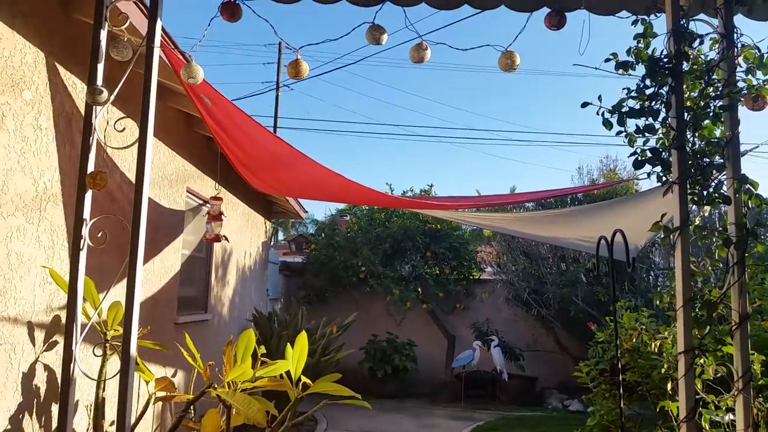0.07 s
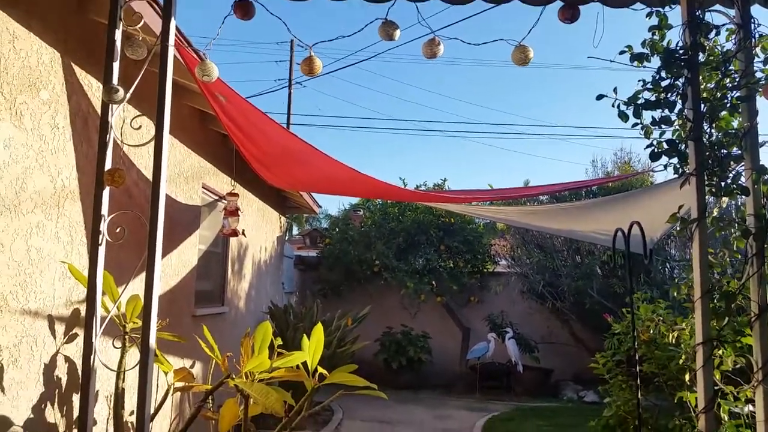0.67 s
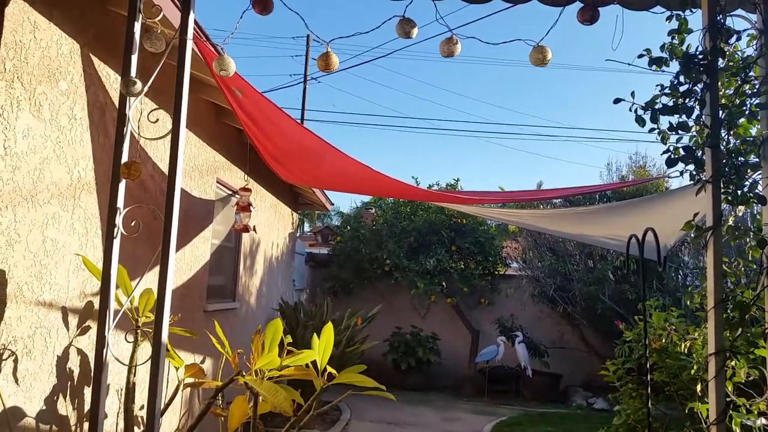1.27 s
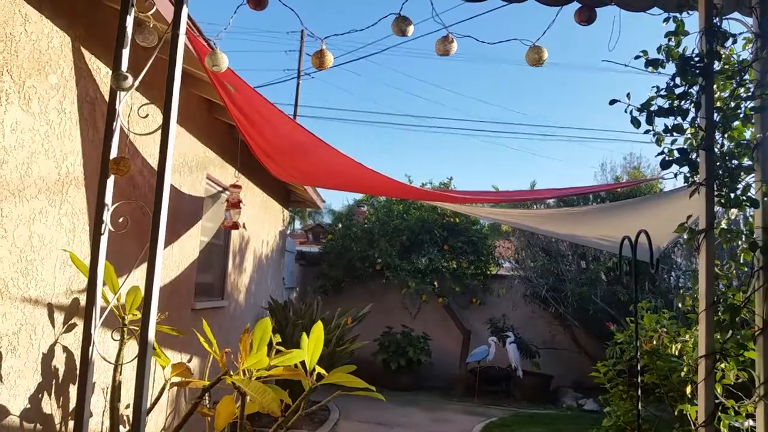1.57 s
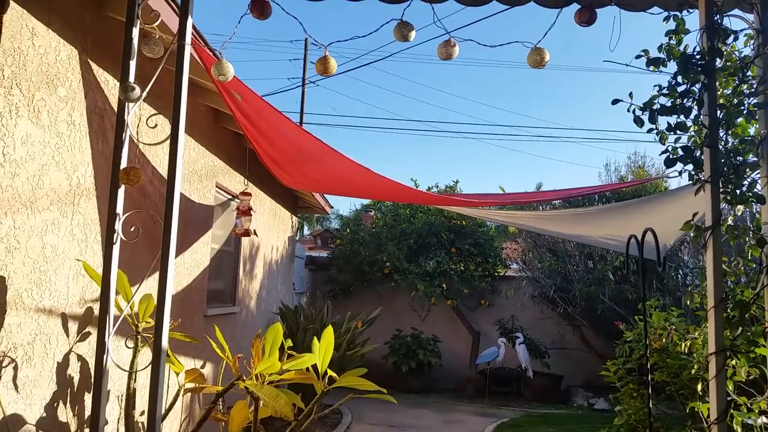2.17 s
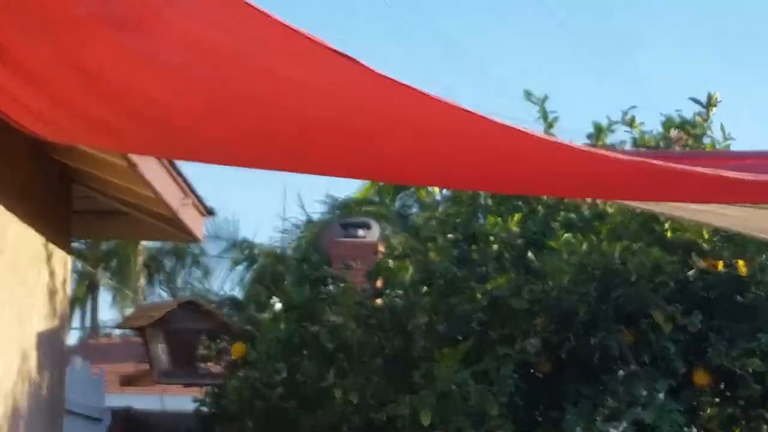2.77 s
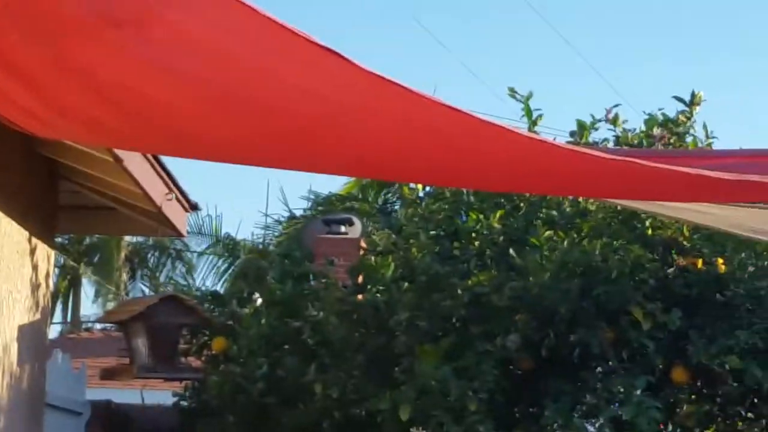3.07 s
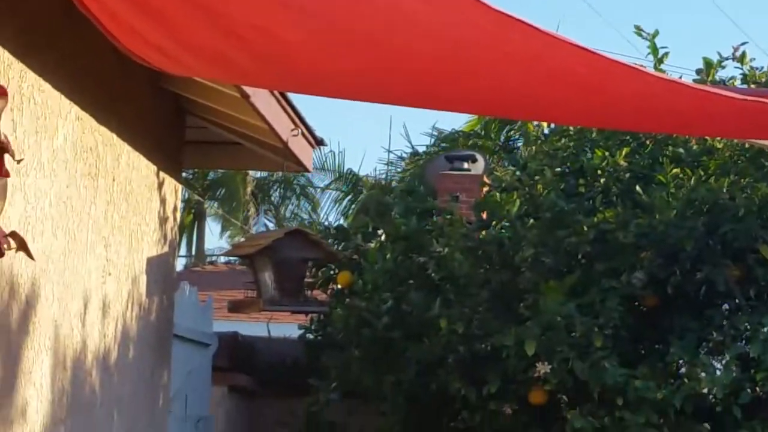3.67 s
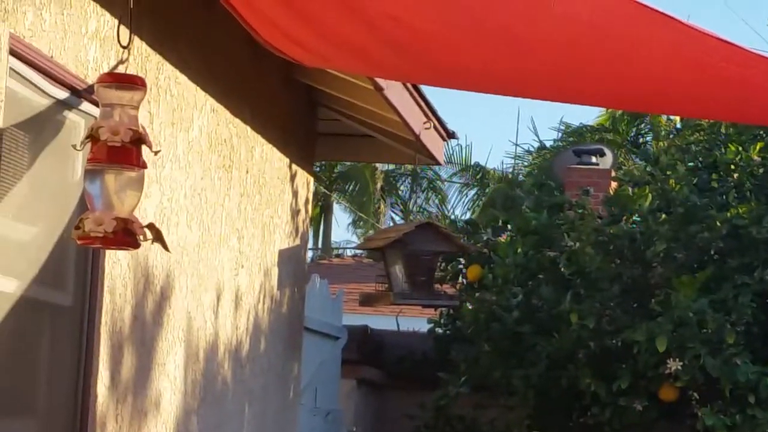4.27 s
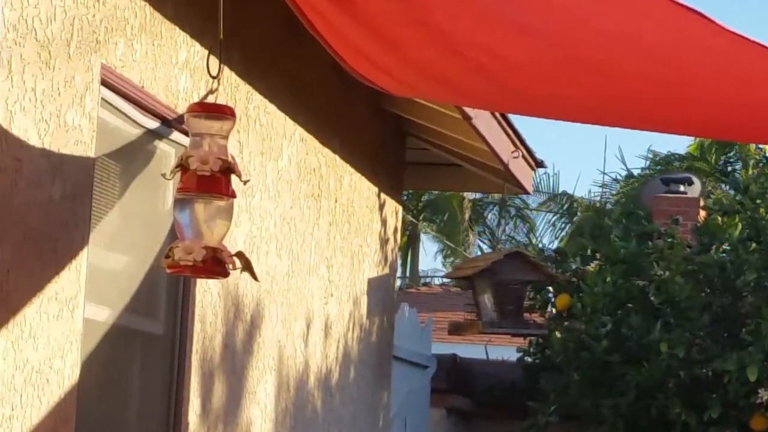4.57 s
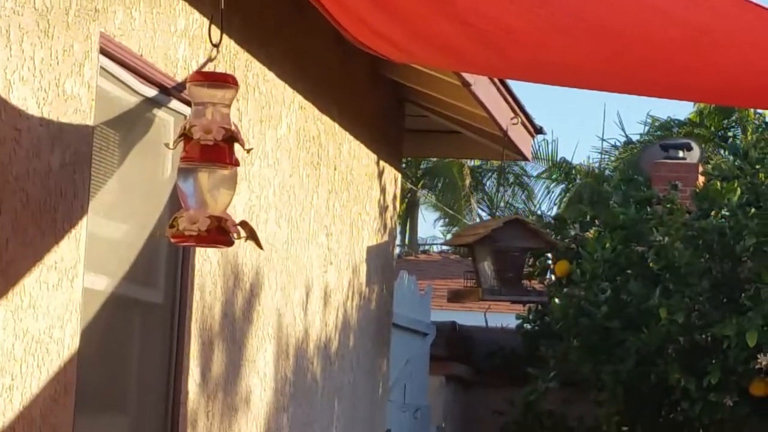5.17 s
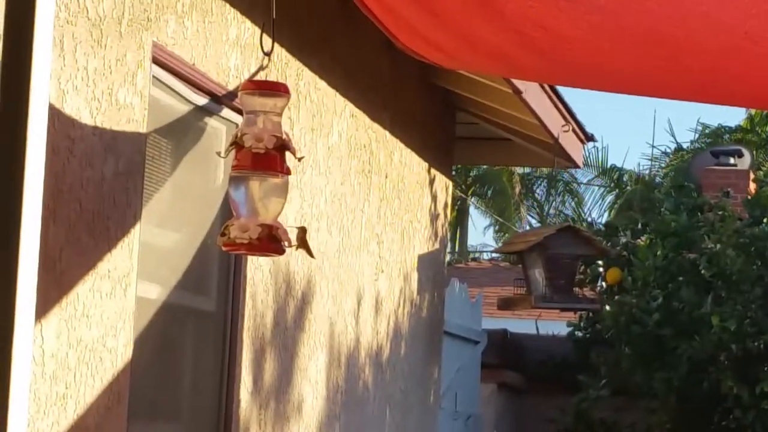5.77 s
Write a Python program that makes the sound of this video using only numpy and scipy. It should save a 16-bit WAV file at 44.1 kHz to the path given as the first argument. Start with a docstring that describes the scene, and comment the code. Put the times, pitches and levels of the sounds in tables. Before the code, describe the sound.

A steady low hum of far roads, an early click and brief rub of handling, then a few faint high bird chirps.

```python
"""Far traffic drones around a quiet back yard: roads rumble, tyres roar, engines hum and one car goes by.
Birds give faint high chirps that scatter off the walls. Early on, a finger ticks, knocks and slides on a
hand-held camera beside its right microphone opening, and later glides over the screen. Near the end a
thin, very high whine hangs for about a second. Stirring air and microphone hiss lie underneath."""
import sys
import numpy as np
from scipy import signal
from scipy.fft import rfft, irfft, next_fast_len
from scipy.io import wavfile
from scipy.ndimage import map_coordinates

SR = 44100
rng = np.random.default_rng(int(sys.argv[2]) if len(sys.argv) > 2 else 0)


def unload_wav(signal):
    """Save mono or channel-first audio to the path in sys.argv[1] as 16-bit WAV at rate SR, clipped to [-1, 1]."""
    wavfile.write(
        sys.argv[1],
        SR,
        np.round(np.clip(np.atleast_2d(signal).T, -1, 1) * 32767).astype(np.int16),
    )


N = 265217


def traffic(rumble_db=-45, growth_db_per_s=0.25, roar_db=-49.5, car_db=-50, nearest_s=2.18, half_pass_s=1.28):
    """Far roads rumble and tyres roar; the roar swells as one car comes closer, then eases as it leaves."""
    # tone colours of the low rumble and of the tyre roar: pitch_hz, level_db
    rumble_colour = [(12, -41), (20, -23), (43, -11), (59, -7.5), (76, -3), (91, 0.5), (114, -5.5),
                     (145, -4.5), (255, -13.5), (400, -19.5), (520, -26.5), (880, -120)]
    roar_colour = [(150, -6), (250, -7), (285, -4), (313, -4.5), (352, -3), (473, 2), (571, 4), (706, -3),
                   (853, 1), (1090, -5), (1350, -5), (2020, -10), (3160, -35), (4200, -59), (5460, -51.5),
                   (9240, -120)]
    rumble = amp(rumble_db + growth_db_per_s * since(0) + 0.97 * wobble(5.9)) * outdoors(rumble_colour)
    car_distance = np.hypot(1, since(nearest_s) / half_pass_s)  # 1 at its nearest
    roar_gain = np.hypot(amp(roar_db), amp(car_db) / car_distance)
    return rumble + roar_gain * amp(0.13 * wobble(4.35)) * outdoors(roar_colour)


def engines(drift_rad=0.43, waver_db=2.0, fade_s=0.13):
    """Only the firing tone of each far engine carries; it follows the engine's speed and wavers."""
    # engine hums: start_s, end_s, start_hz, end_hz, level_db
    hums = [(0.0, 0.012, 93, 96.7, -42), (0.245, 0.382, 94.8, 96.2, -42.5), (0.684, 0.97, 95, 96, -42),
            (1.4, 1.844, 94.55, 94.7, -46.5), (2.35, 2.81, 88.06, 90.8, -47.5),
            (2.779, 3.42, 78.3, 100.1, -44), (3.044, 3.475, 126.7, 130.9, -45),
            (3.601, 4.12, 97, 109.9, -44), (4.094, 4.653, 134, 130.8, -51.5), (4.978, 5.75, 87, 76, -42.5),
            (5.353, 5.795, 132, 126.7, -50)]
    out = np.zeros(N)
    for start, end, start_hz, end_hz, db in hums:
        hz = np.interp(since(0), [start, end], [start_hz, end_hz])
        phase = 2 * np.pi * np.cumsum(hz) / SR + drift_rad * wobble(14)
        gain = during(start, end, fade_s) * amp(db + waver_db * wobble(9))
        out += gain * np.sqrt(2) * np.sin(phase)
    return out * pan(1.8)


def birds(rasp_hz=400, rasp_at_hz=3500, shakes_per_s=1300, direct_db=-6, echo_db=1.0):
    """Short sliding notes whose pitch shakes fast into a rasp, heard mostly through their echoes."""
    # bird notes: start_s, length_s, start_hz, end_hz, relative_level_db, left_minus_right_db
    chirps = [(0.701, .12, 10170, 9570, -56.5, -2), (2.308, 0.032, 4300, 6000, -68, 12.5),
              (2.356, 0.077, 3595, 3765, -59, 8), (2.408, 0.054, 3460, 2950, -61.5, 5),
              (3.29, 0.066, 3330, 3700, -73, 4), (3.3, 0.04, 10500, 10000, -73, -9),
              (4.533, 0.04, 4420, 6250, -69, 11), (4.555, 0.061, 2690, 3400, -68, 6),
              (4.591, 0.075, 3404, 3720, -61.5, 7), (4.631, 0.067, 3430, 2890, -62, 7)]
    calls = np.zeros((2, N))
    for start, length, start_hz, end_hz, db, lean_db in chirps:
        progress = np.linspace(0, 1, int(length * SR))
        depth_hz = rasp_hz * (start_hz / rasp_at_hz) ** 0.5  # higher notes shake wider
        shake = np.tanh(wobble(shakes_per_s)[:len(progress)])
        hz = start_hz + (end_hz - start_hz) * progress + depth_hz * shake
        note = np.sin(np.pi * progress) * np.sin(2 * np.pi * np.cumsum(hz) / SR)
        add(calls, start, amp(db) * pan(lean_db) * note)
    return amp(direct_db) * calls + amp(echo_db) * yard_echo(calls)


def knocks(left_delay_s=0.00075, low_cut_hz=230):
    """Each finger knock makes the case ring briefly; soft flesh brings out only its low tones."""
    # tones the case rings with: pitch_hz, width_hz (wider dies sooner), relative_level_db
    case_tones = [(457, 30, 1), (518, 59, 6), (640, 68, 4.5), (905, 140, 9), (1060, 190, -3),
                  (1375, 200, 6), (1870, 250, 0.5), (2740, 310, -15.5), (5460, 1240, -16.5),
                  (6700, 790, -17.5), (10100, 1300, -14.5)]
    # finger knocks: start_s, right_peak_db, brightness_hz, left_minus_right_db
    contacts = [(0.535, -19.5, 440, -18), (0.6448, 0, 8500, -12), (0.6464, -2.5, 1140, -54),
                (0.6539, -12.5, 1500, -14), (0.7533, -12.5, 850, -41)]
    out, t = np.zeros((2, N)), np.arange(SR // 16) / SR
    ring = sum(amp(db) * width * np.exp(-np.pi * width * t) * np.sin(2 * np.pi * hz * t)
               for hz, width, db in case_tones)
    ring = signal.lfilter(*signal.butter(1, low_cut_hz, 'high', fs=SR), ring)  # small case, little bass
    for start, db, bright_hz, lean_db in contacts:
        blow = signal.lfilter(*signal.butter(2, bright_hz, fs=SR), ring)
        blow = amp(db) * blow / np.abs(blow).max()
        add(out[1:], start, blow)
        # the wave through the case reaches the left microphone later and weaker
        add(out[:1], start + left_delay_s, amp(lean_db) * blow)
    return out


def ticks(rise_s=0.0004):
    """Tiny hard touches on the case: a millisecond of bright noise each."""
    # dry ticks: start_s, relative_level_db, left_minus_right_db
    touches = [(0.5153, -23, -9), (0.591, -45, -20), (0.619, -41.5, -13), (0.633, -41, -22),
               (2.901, -54, 0), (2.928, -53, 2)]
    # tone colour of a tick: pitch_hz, gain_db
    colour = [(1500, -9), (4000, -21), (5200, -21), (6400, -2), (8300, -22), (10000, -13), (12000, -1),
              (14000, -16), (16000, -16)]
    out, age = np.zeros((2, N)), np.arange(SR // 100) / SR / rise_s
    shape = (age * np.exp(1 - age)) ** 3
    for start, db, lean_db in touches:
        burst = rng.standard_normal((2, len(age))) * shape
        add(out, start, amp(db + 5) * pan(lean_db) * burst)
    return filtered(out, lambda hz: amp(along(colour, hz)))


def case_slides(grain_db=2.5, squeak_above_hz=9000):
    """Skin catches and slips on the case in fine grains; a light touch is squeakier."""
    # finger slides: peak_s, rise_s, fall_s, level_db, extra_squeak_db
    strokes = [(0.62, 0.023, 0.033, -71.5, 22), (0.673, 0.022, 0.059, -38.5, -3),
               (0.92, 0.025, 0.027, -47, -0.5)]
    # tone colour of rubbing skin: pitch_hz, level_db
    colour = [(200, -8.5), (500, -8), (1050, -4.5), (2000, -18), (3100, -21.5), (4200, -40), (5500, -24),
              (7200, -30.5), (8400, -38), (10300, -18), (11700, -21), (13500, -27), (15500, -26)]
    friction = unit(noise(colour) * amp(grain_db * wobble(500)))
    squeak = filtered(friction, lambda hz: hz > squeak_above_hz)
    return pan(-10.5) * sum(amp(db) * swell(peak, rise, fall) * (friction + (amp(squeak_db) - 1) * squeak)
                            for peak, rise, fall, db, squeak_db in strokes)


def screen_glides(catch_db=1.5):
    """A fingertip on smooth glass gives only a faint, high, uneven rustle."""
    # glides over the screen: peak_s, rise_s, fall_s, level_db
    strokes = [(2.22, 0.15, 0.36, -71), (3.38, 0.15, 0.19, -69)]
    # tone colour of skin on glass: pitch_hz, level_db
    colour = [(3500, -18), (4500, -19), (8500, -23), (10500, -16), (12100, 2), (13000, -4), (15500, -6.5)]
    gain = sum(amp(db) * swell(peak, rise, fall) for peak, rise, fall, db in strokes)
    return gain * amp(catch_db * wobble(45)) * pan(-2.5) * noise(colour)


def whine(pitch_hz=13500, sharp_hz=380, settle_s=0.14, flutter_hz=100, wander_hz=35, growth_db_per_s=3):
    """A thin, fuzzy, very high tone: it starts sharp and settles, breaks off once and slowly swells."""
    # stretches of the whine: start_s, end_s, start_level_db
    spans = [(3.706, 3.95, -69.5), (4.01, 4.88, -67)]
    gain = sum(during(start, end, fade_s=0.025) * amp(db + growth_db_per_s * since(start))
               for start, end, db in spans)
    age_s = np.maximum(since(spans[0][0]), 0)
    centre_hz = pitch_hz + sharp_hz * np.exp(-age_s / settle_s) + wander_hz * wobble(12)
    hz = centre_hz + flutter_hz * np.array([wobble(600), wobble(600)])
    return gain * amp(1.1 * wobble(70)) * pan(-7.5) * np.sin(2 * np.pi * np.cumsum(hz, axis=1) / SR)


def draught(level_db=-56, unrest_db=1.0):
    """Slightly moving air, with a few puffs, rumbles at each microphone on its own."""
    # stronger puffs of air: peak_s, level_db
    puffs = [(0.17, -47), (2.17, -47.5), (2.77, -41)]
    # tone colour of air hitting a microphone: pitch_hz, level_db
    colour = [(8, -26), (18, -4), (40, 2.5), (70, -10), (150, -34), (400, -89)]
    puff_gain = sum(amp(db) * swell(peak, rise_s=0.039, fall_s=0.12) for peak, db in puffs)
    return (amp(level_db + unrest_db * wobble(2.7)) + puff_gain) * noise(colour)


def hiss(level_db=-70.0):
    """The faint, even hiss of the two microphones."""
    # tone colour of the hiss: pitch_hz, level_db
    colour = [(2000, -44), (3500, -5), (5500, -7.5), (6700, -4.5), (7500, -15), (8600, -26.5),
              (10000, -15.5), (12000, -4.5), (15500, -1.5)]
    return amp(level_db + 0.44 * wobble(3.16)) * pan(1.6) * noise(colour)


def outdoors(colour):
    """Far noise: alike on both sides in the bass, wide and leaning left higher up."""
    # stereo width: pitch_hz, side_minus_middle_db
    width = [(60, -22), (99, -11), (160, -18.5), (270, -11.5), (450, -6.5), (740, 0), (1220, 3.5),
             (2010, -3), (3330, 1), (5500, 14), (9080, 10.5), (15000, -7)]
    # stereo balance: pitch_hz, left_minus_right_db
    lean = [(60, 0), (270, 2), (450, -1.5), (740, 2.5), (1220, 4.5), (2000, 8.5), (3300, 3.5)]
    middle, side = noise(colour)
    side = filtered(side, lambda hz: amp(along(width, hz)))
    stereo = np.array([middle + side, middle - side])
    return filtered(stereo, lambda hz: amp(np.outer([1, -1], along(lean, hz)) / 2))


def yard_echo(x):
    """Walls and trees scatter a sound into a soft echo, different at each microphone."""
    # time the echo takes to fade by 60 dB: pitch_hz, fade_s
    fade_times = [(500, 0.58), (3500, 0.67), (10000, 0.45)]
    hz, t, spectrum = signal.stft(rng.standard_normal((2, SR // 2)), SR, nperseg=256)
    fade = amp(-60 * t / along(fade_times, hz)[:, None])
    tail = signal.istft(spectrum * fade, SR, nperseg=256)[1]
    return signal.fftconvolve(x, tail / np.linalg.norm(tail[0]), axes=1)[:, :N]


def amp(db):
    """Turn decibels into a gain."""
    return 10 ** (np.asarray(db) / 20)


def unit(x):
    """Scale to an average (rms) level of 1."""
    return x / np.sqrt(np.mean(x ** 2) + 1e-20)


def along(points, hz):
    """Read between (pitch_hz, value) points on a log pitch scale."""
    pitches, values = np.transpose(points)
    return np.interp(np.log(hz + 1), np.log(pitches + 1), values)


def since(start_s):
    """Seconds since start_s, one value per sample."""
    return np.arange(N) / SR - start_s


def during(start_s, end_s, fade_s):
    """1 from start to end, fading to 0 outside."""
    return np.clip(1 + np.minimum(since(start_s), -since(end_s)) / fade_s, 0, 1)


def swell(peak_s, rise_s, fall_s, roundness=1.15):
    """A rounded rise to 1, then a fall."""
    t = since(peak_s)
    return np.exp(-np.abs(t / np.where(t < 0, rise_s, fall_s)) ** roundness)


def wobble(per_s):
    """A smooth curve through per_s random values a second."""
    return map_coordinates(rng.standard_normal(int(N * per_s / SR) + 4), [np.arange(N) * per_s / SR])


def filtered(x, response):
    """Multiply each frequency in x by response(hz)."""
    n = x.shape[-1]
    padded = next_fast_len(n + 8192)
    return irfft(rfft(x, padded) * response(np.fft.rfftfreq(padded, 1 / SR)), padded)[..., :n]


def noise(colour):
    """Two unrelated noises at level 1; the colour sets only the balance of low and high."""
    return unit(filtered(rng.standard_normal((2, N)), lambda hz: amp(along(colour, hz))))


def pan(lean_db):
    """Left and right gains; a positive lean is louder on the left."""
    return amp(np.array([[lean_db], [-lean_db]]) / 2)


def add(track, start_s, sound):
    """Mix a sound into a track from start_s on."""
    part = track[:, round(start_s * SR):][:, :sound.shape[-1]]
    part += sound[..., :part.shape[-1]]


def scene():
    """Yard sounds, finger sounds and hiss together."""
    outside = traffic() + engines() + birds() + whine() + draught()
    finger = knocks() + ticks() + case_slides() + screen_glides()
    return outside + finger + hiss()


def record(dry, ring_hz=6620, width_hz=600, ring_db=18, top_hz=15830):
    """The hollow of the left microphone opening rings in the treble; nothing passes above top_hz."""
    hollow = lambda hz: 1 + amp(ring_db) * 1j * hz * width_hz / (ring_hz**2 - hz**2 + 1j * hz * width_hz)
    left = filtered(dry[0], hollow)
    return filtered(np.array([left, dry[1]]), lambda hz: hz < top_hz)


dry = scene()
out = record(dry)
unload_wav(out)
```